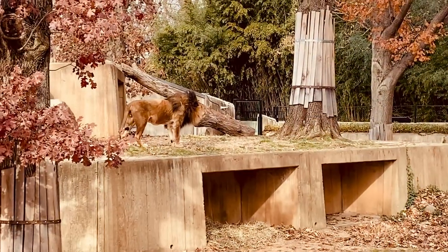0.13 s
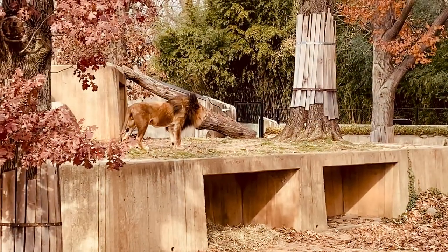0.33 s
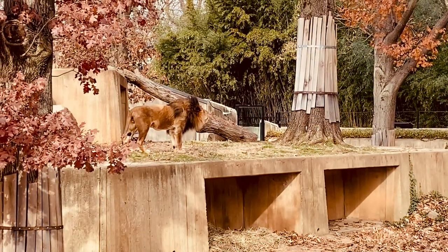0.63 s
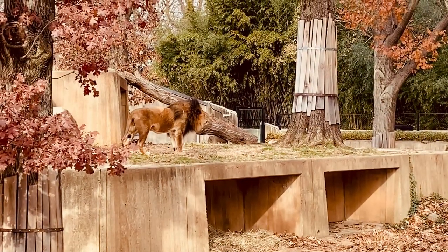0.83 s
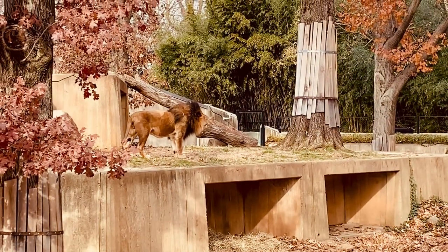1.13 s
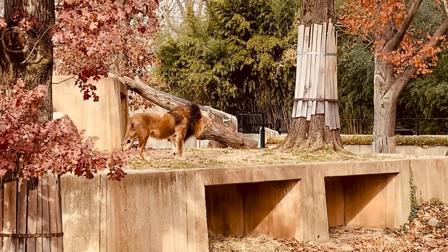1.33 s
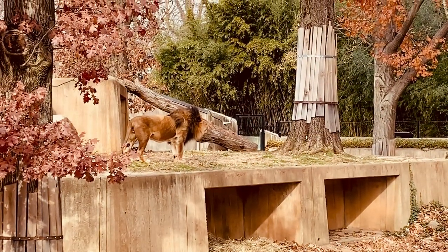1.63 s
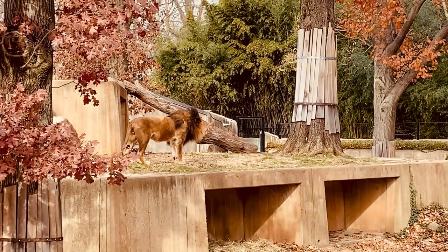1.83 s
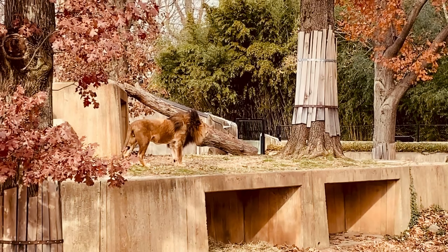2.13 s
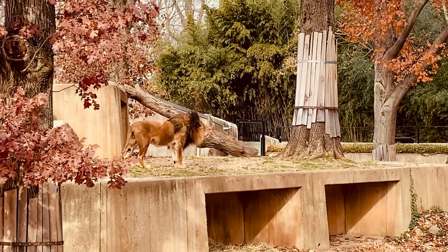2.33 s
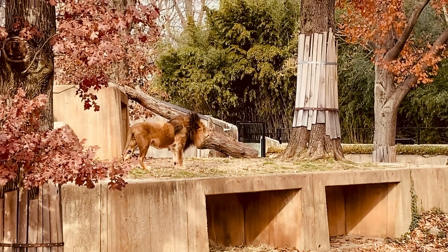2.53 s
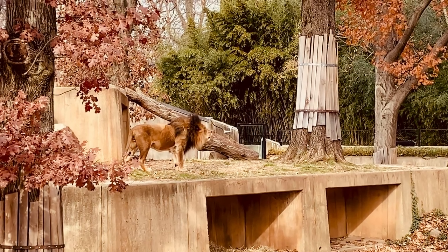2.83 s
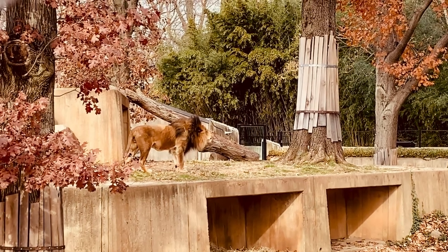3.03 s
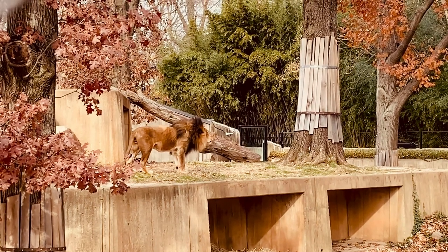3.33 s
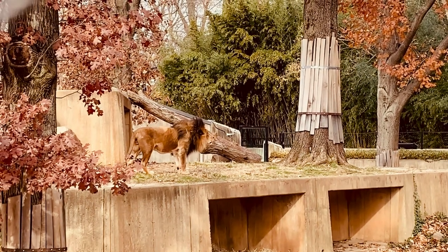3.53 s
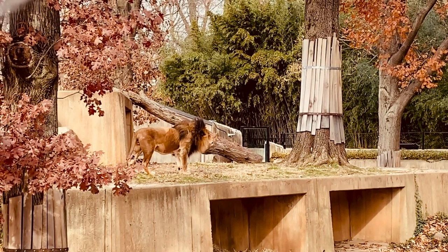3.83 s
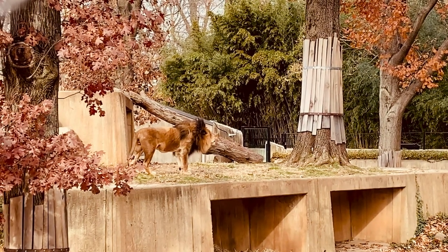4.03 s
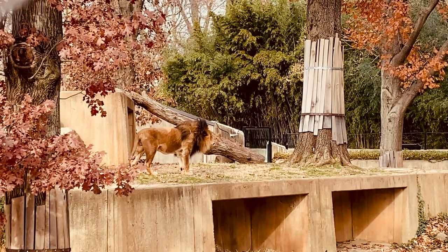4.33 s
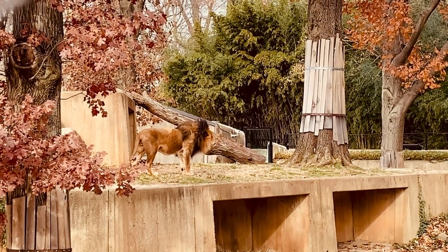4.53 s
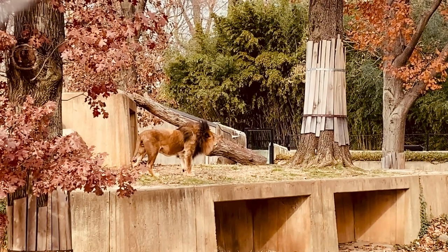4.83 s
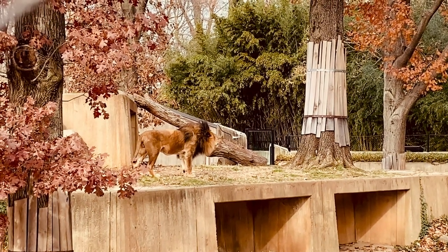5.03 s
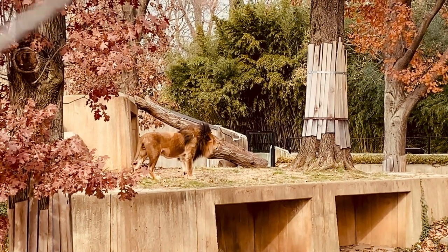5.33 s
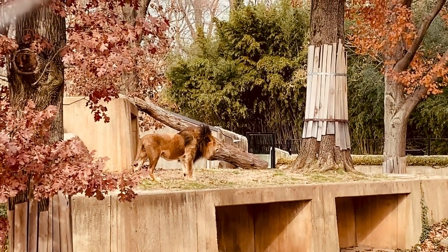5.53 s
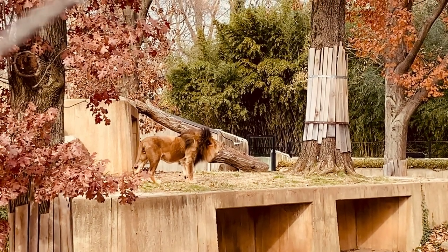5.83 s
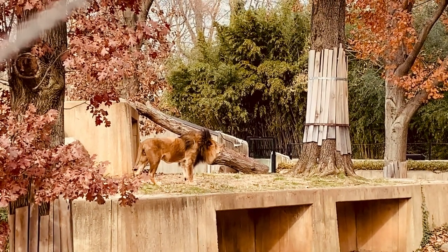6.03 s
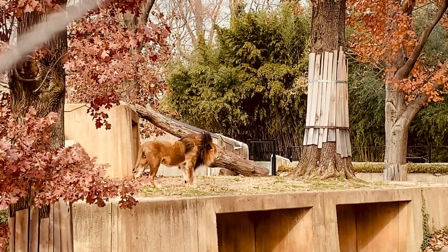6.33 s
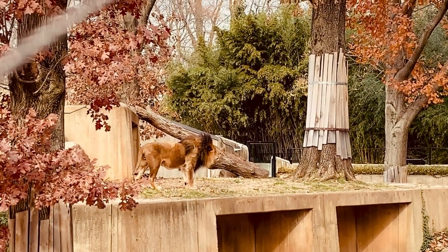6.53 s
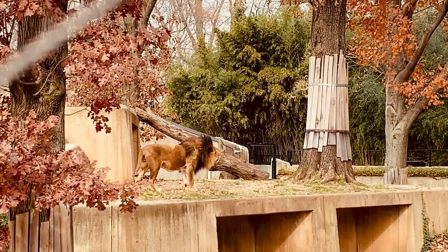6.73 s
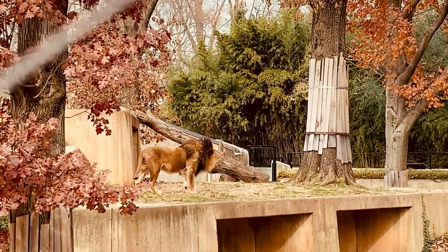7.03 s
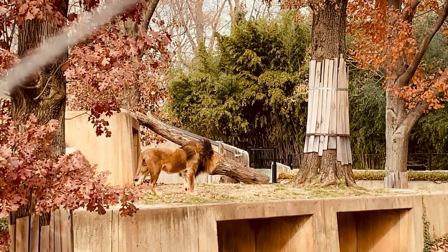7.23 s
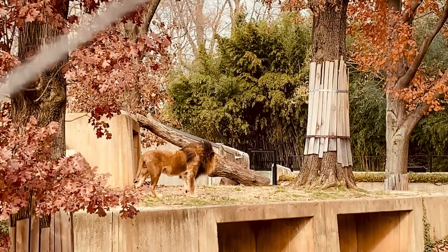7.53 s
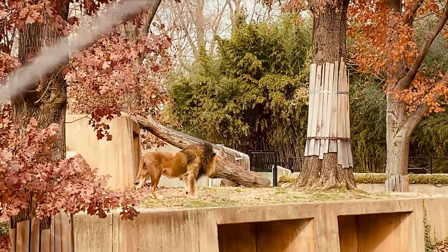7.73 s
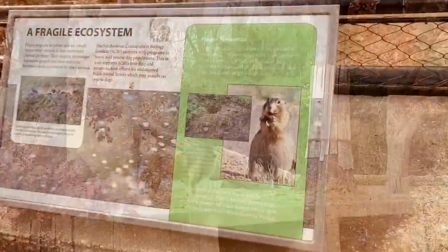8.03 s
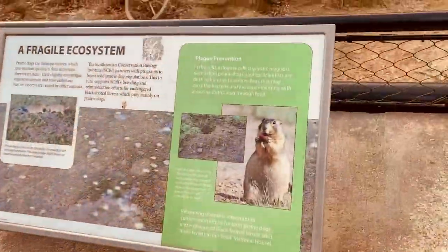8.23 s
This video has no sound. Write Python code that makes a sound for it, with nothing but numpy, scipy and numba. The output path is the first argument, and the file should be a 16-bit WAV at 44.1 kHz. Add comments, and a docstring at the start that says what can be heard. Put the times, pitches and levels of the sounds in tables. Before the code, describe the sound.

A distant male lion roars twice, then gives five shorter, fading grunts that echo off concrete walls over a low outdoor rumble.

```python
"""Lion calling in a walled yard

A lion roars twice, the first roar already under way, then grunts five times, far from a hand-held phone.
Heavy vocal folds beat about 140 times a second, strong and weak in turn, into a long throat.
Filtered noise echoes from concrete walls draw out each call. Shaped noise makes the low background with its
distant town rumble, a far moan, cloth rustle and small ticks near the phone; near the end the low
background cross-fades to a brighter one."""
import sys
import numpy as np
from scipy import signal
from scipy.fft import rfft, irfft
from scipy.io import wavfile
from scipy.ndimage import uniform_filter1d
from numba import njit

SR = 44100
rng = np.random.default_rng(int(sys.argv[2]) if len(sys.argv) > 2 else 0)


def materialize(psi):
    """Save the field psi as 16-bit PCM at rate SR to the path in sys.argv[1].

    A 1-D psi becomes a single channel; in a 2-D psi each row is a channel.
    """
    bounded = np.clip(np.atleast_2d(psi).T, -1, 1)
    quanta = np.round(bounded * 32767).astype(np.int16)
    wavfile.write(sys.argv[1], SR, quanta)


N = 369381

# The seven calls, levels ahead of the mix: t/s, breath length/s, open-mouth ring level/dB,
# breath rasp level/dB, chest rumble level/dB, jaw resonance f/Hz (it wanders about this),
# pitch factor of the low throat resonances, factor of the upper ones, trim of the throat growl level/dB
CALLS = [(-.1, 0.76, -30, -41, -37.5, 315, 1.0, 0.98, -4),
         (1.702, 0.46, -33.5, -43.5, -31, 300, 0.99, 1.011, -2.5),
         (2.981, 0.23, -31.5, -41, -29.5, 296, 0.99, .98, -2),
         (3.931, .2, -35, -45, -33, 293, 0.88, 1.063, 1), (4.883, .23, -35.5, -47, -31, 295, .87, 1.01, -3),
         (5.898, .26, -38, -48.5, -36, 303, 0.76, 1.057, -4),
         (7.14, 0.26, -38.5, -51, -39.5, 302.5, 0.89, .99, -2.5)]
# Voice and its first echoes through each call, with the dips where echoes beat, one list a call:
# t/s, beat rate of the folds f/Hz, boom level/dB, throat growl level/dB (ahead of its trim)
VOICES = [
    [(0.0, 154.9, -21.5, -25), (0.092, 154.6, -9.5, -20.5), (0.214, 158.2, -22, -20.5),
     (0.26, 156.4, -13, -25), (0.282, 153.9, -33.5, -26.5), (0.356, 162.2, -13.5, -22.5),
     (0.476, 157.5, -9, -29.5), (0.632, 156.3, -20.5, -20.5), (0.668, 162.3, -30, -28),
     (0.75, 160.3, -16.5, -31.5), (0.816, 152.3, -27, -40.5), (0.95, 157.2, -24.5, -40)],
    [(1.7, 144, -51, -37.5), (1.772, 140.8, -25.5, -26.5), (1.808, 147.7, -28.5, -33.5),
     (1.83, 148.7, -15.5, -23), (1.87, 150.4, -10, -22.5), (1.926, 153.3, -14, -28), (2.0, 150.4, -11, -22),
     (2.056, 145.6, -14, -27.5), (2.19, 145.9, -17.5, -27), (2.36, 147.4, -25, -44),
     (2.42, 156.4, -31, -38), (2.45, 154, -26, -40.5)],
    [(2.97, 136, -48, -42.5), (3.008, 133.3, -35, -34.5), (3.062, 134.3, -18, -31),
     (3.104, 145.4, -26.5, -21.5), (3.136, 147, -13, -24), (3.316, 148.8, -24.5, -32),
     (3.422, 144.6, -24, -49), (3.5, 151.1, -33, -44)],
    [(3.92, 133.9, -38, -45), (3.954, 129.4, -42, -37), (4.008, 129.8, -21.5, -25.5),
     (4.18, 130.9, -23, -29.5), (4.236, 128, -34, -36.5), (4.288, 137.6, -26, -40.5),
     (4.43, 134.9, -32, -48.5), (4.45, 136, -38.5, -41)],
    [(4.87, 133.2, -40.5, -51), (4.906, 133.1, -43, -34.5), (4.95, 130.4, -20.5, -27),
     (5.058, 131.8, -23, -16), (5.11, 131.2, -40.5, -32.5), (5.132, 132.4, -17, -28.5),
     (5.166, 133.8, -28.5, -42), (5.4, 136.4, -31, -45.5)],
    [(5.88, 116.8, -61, -53), (5.968, 115.9, -25.5, -21), (6.024, 128.4, -21, -21.5),
     (6.194, 128.3, -19, -31), (6.284, 126.9, -31, -47.5), (6.354, 117, -32.5, -47.5),
     (6.414, 130.7, -32.5, -53.5), (6.45, 131.1, -31, -48)],
    [(7.12, 116.4, -49.5, -50), (7.17, 116.8, -37, -35.5), (7.258, 121.2, -16, -25),
     (7.336, 129.6, -31.5, -28), (7.49, 128.8, -24, -37.5), (7.514, 132.8, -48.5, -44),
     (7.552, 122.3, -27, -47), (7.66, 122.5, -32.5, -49)],
]
CREAK_S = 0.065  # slow single beats that open every call but the first


def undb(db):
    """Gain of a dB value."""
    return 10 ** (np.asarray(db) / 20)


def seconds():
    """Time of every sample."""
    return np.arange(N) / SR


def level(x, db):
    """Scale to an rms level."""
    return x * undb(db) / np.sqrt(np.mean(x ** 2))


def curve(rows, k, off=None):
    """Column k of a table over time."""
    rows = np.array(rows)
    return np.interp(seconds(), rows[:, 0], rows[:, k], off, off)


def on_log(rows, hz):
    """A (f/Hz, value) table read on a log frequency axis."""
    rows = np.array(rows)
    return np.interp(np.log(hz), np.log(rows[:, 0]), rows[:, 1])


def fade(start, end, edge_s=0.042):
    """1 from start to end, with soft edges outside."""
    s = seconds()
    return np.clip(np.minimum(s - start + edge_s, end + edge_s - s) / edge_s, 0, 1)


def release(after_s, db_per_s):
    """Gain 1 that starts to die away at a given time."""
    return undb(-db_per_s * np.maximum(seconds() - after_s, 0))


def walk(rate):
    """Random levels held 1 / rate s and slewed twice; spread near 1."""
    k = int(SR / rate)
    steps = np.repeat(rng.standard_normal(N // k + 1), k)
    return 1.3 * uniform_filter1d(uniform_filter1d(steps, k), k)[:N]


def colour(x, rows):
    """Shape a sound by a (f/Hz, level/dB) table."""
    hz = np.fft.rfftfreq(len(x), 1 / SR) + 1
    return irfft(rfft(x) * undb(on_log(rows, hz)), len(x))


def band(x, hz, width):
    """One fixed resonance, gain 1 at its centre."""
    return signal.lfilter(*signal.iirpeak(hz, hz / width, SR), x)


@njit
def glide(x, hz, width):
    """State-variable band-pass whose centre moves."""
    y, b, l = np.empty(len(x)), 0., 0.
    for i in range(len(x)):
        g = np.tan(np.pi * hz[i] / SR)
        k = width / hz[i]
        v = (b + g * (x[i] - l)) / (1 + g * (g + k))
        b = 2 * v - b
        l = l + 2 * g * v
        y[i] = k * v
    return y


def steep_glide(x, hz, width, second_width):
    """Two moving band-passes in a row, for steeper skirts."""
    return glide(glide(x, hz, width), hz, second_width)


def sine(hz):
    """A tone of rms 1 that follows a pitch curve."""
    return np.sqrt(2) * np.sin(2 * np.pi * np.cumsum(hz) / SR)


def ring(x, modes, stretch):
    """Sum of steep resonances, neighbours in opposite sign, all moved by one factor."""
    out = 0
    for k, (hz, width, db) in enumerate(modes):
        part = level(steep_glide(x, hz * stretch, 1. * width, 1.57 * width), 0)
        out = out + (-1) ** k * undb(db) * part
    return level(out, 0)


def per_call(values):
    """One value a call, taken up just before the call starts."""
    starts = [call[0] - CREAK_S for call in CALLS]
    return np.asarray(values)[np.maximum(np.searchsorted(starts, seconds()) - 1, 0)]


def breath(shape, column):
    """Attack, hold and release of every call at the level in one column of CALLS."""
    start_db, jump_s, jump_db, full_s, end_db, db_per_s = shape
    out = 0
    for call in CALLS:
        start, end = call[0], call[0] + call[1]
        full = min(start + full_s, end - .01)
        rows = [(start, start_db), (start + jump_s, jump_db), (full, 0), (end, end_db)]
        gain = undb(curve(rows, 1) + call[column])
        out = out + fade(start, N / SR, .006) * gain * release(end, db_per_s)
    return out


def boom():
    """The beat rate sits on the lowest resonance, so it booms; noise in the chest rumbles below it."""
    boom_release = 63  # dB per s: the boom rings on among the walls
    echo_db, late_echo_db = -16, -7.5  # echo tone against the boom, during the breath and after it
    chest_rest_db, chest_rise_s, chest_lag_s, chest_release = -44, 0.39, 0.036, 32.5  # release in dB per s
    hz = curve(sum(VOICES, []), 1)
    gain = sum(fade(voice[0][0], N / SR) * undb(curve(voice, 2)) * release(voice[-1][0], boom_release)
               for voice in VOICES)
    # echoes of a slightly lower pitch beat against the tone
    breathing = sum(fade(call[0], call[0] + call[1], .06) for call in CALLS)
    echo_gain = undb(late_echo_db + (echo_db - late_echo_db) * breathing)
    tone = sine(hz * (1 + 0.007 * walk(25))) + echo_gain * sine(hz - 15 + 3 * walk(5))
    noise = rng.standard_normal(N)
    chest = undb(chest_rest_db)
    for call in CALLS:  # the rumble peaks after the breath and lingers
        top = call[0] + call[1] + chest_lag_s
        swell = fade(top, N / SR, chest_rise_s) ** 2
        chest = chest + swell * undb(call[4]) * release(top, chest_release)
    rumble = level(band(band(noise, 57, 35), 94, 120), 0) * chest
    smear = level(glide(glide(noise, 1.0 * hz, 39.0), 0.89 * hz, 52.0), -17.5)
    return gain * (tone + smear) + rumble, hz, gain


def growl():
    """Level of the throat growl, cut short when the breath ends."""
    out = 0
    for call, voice in zip(CALLS, VOICES):
        gain = undb(curve(voice, 3) + call[8])
        out = out + fade(call[0], N / SR, .01) * gain * release(call[0] + call[1], 130.5)  # dB per s
    return out


def folds(hz, rough):
    """One closure a beat, strong and weak in turn, uneven when rough, each followed by a puff of air."""
    creak_hz, weak_db = 44, -5
    s = seconds()
    creak = sum((s > call[0]) & (s < call[0] + CREAK_S) for call in CALLS[1:]) > 0
    hz = np.where(creak, creak_hz, hz)
    phase = np.cumsum(hz * (1 + .15 * rough * walk(60))) / SR
    for call in CALLS[1:]:  # a call opens with a closure
        i = int(call[0] * SR)
        phase[i:] += -phase[i - 1] % 1
    cycle = phase.astype(int)
    uneven_db = 5 * rough * rng.standard_normal(N)[cycle]
    size = undb(uneven_db + weak_db * (cycle % 2) * ~creak)
    pulses = np.diff(cycle, prepend=0) * size / hz ** 0.37
    puff_shape = .7 + np.exp(-(phase % 1) / .3)
    puff = np.sqrt(size) * puff_shape * rng.standard_normal(N)
    return level(pulses, 0), level(puff, 0)


def roar(hz, throat):
    """Fold pulses and puffs through the throat; higher resonances are fed more by the air."""
    # per call: 0 clear folds to 1 all noise, in the low throat
    roughness = [.3, .35, .4, .7, .62, .6, .65]
    # throat resonances: f/Hz, width/Hz, level/dB within the group; Hz ahead of the call's pitch factor
    low_modes = [(227, 64, -5.5), (400, 194, -7.5), (490.8, 116, -5)]
    mid_modes = [(760.7, 61, -1), (1012.4, 85, -5), (1186, 85, -7), (1396, 150, -15)]
    high_modes = [(1755, 100, -5), (2118, 390, -1), (2587, 290, -2.5), (3000, 440, -3), (3880, 1000, -11),
                  (5080, 2800, -9.5)]
    # breath shape of the open-mouth ring: level/dB at start, first jump t/s, level/dB after it,
    # full t/s, level/dB as breath ends, release dB/s; times from the start of the call
    ring_shape = (-17.5, .04, -9.5, -0.14, -3, 197.5)
    # breath shape of the rasp: same columns
    rasp_shape = (-23, 0.1465, -4, -0.05, -3.5, 113)
    rough = per_call(roughness)
    pulses, puff = folds(hz, rough)
    gains = [throat, breath(ring_shape, column=2), breath(rasp_shape, column=3)]
    groups = [(low_modes, 0), (mid_modes, .1), (high_modes, .72)]  # with extra share of air
    out, columns = 0, np.array(CALLS).T
    for k, (modes, airy) in enumerate(groups):
        share = np.clip(rough + airy, 0, 1)
        drive = np.sqrt(1 - share) * pulses + np.sqrt(share) * puff
        pitch_factor = per_call(columns[6 + min(k, 1)])
        voice = ring(drive, modes, pitch_factor * (1 + 0.035 * rough * walk(9)))
        if k == 0:  # the jaw moves the second resonance
            jaw_hz = per_call(columns[5]) * (1 + 0.044 * walk(4.6))
            voice = voice + level(steep_glide(drive, jaw_hz, 99.0, 130.0), 0.017)
        out = out + voice * gains[k]
    return out


def overtones(hz):
    """Harmonics 4 to 6 of the strong-weak pair swell and fade where the folds beat evenly."""
    # moments of even beating: t/s, length/s, 4th harmonic level/dB, 5th level/dB, 6th level/dB;
    # a random flicker moves about these levels
    even_moments = [(0, 0.17, -31.5, -31.5, -44.5), (0.102, 0.18, -40.5, -25, -46),
                    (0.267, 0.2, -23, -30.5, -35.5), (0.555, 0.1, -33, -28, -36.5),
                    (1.758, 0.14, -29, -30.5, -37.5), (1.94, 0.12, -31.5, -25, -33),
                    (2.111, .18, -33.5, -36, -45), (3.078, 0.11, -24.5, -42, -32.5),
                    (3.192, 0.18, -27.5, -43, -47), (5.995, .28, -37.5, -36.5, -37.5)]
    flicker_db = 2
    s, out = seconds(), 0
    pair_hz = hz / 2 * (1 + .004 * walk(30))
    for k in range(3):
        gain = 0
        for row in even_moments:
            progress = np.clip((s - row[0]) / row[1], 0, 1)
            gain = gain + np.sqrt(np.abs(np.sin(np.pi * progress))) * undb(row[k + 2])
        out = out + sine((k + 4) * pair_hz) * gain * undb(flicker_db * walk(17))
    return out


def walls(x):
    """Dense echoes off the concrete, each band of noise dying at its own rate."""
    # echo bands: f/Hz, t60/s, level/dB (relative)
    echo_bands = [(244, 0.77, -1.8), (535, 0.5, -2.9), (920, 1.1, -5), (2700, 0.88, 5.5), (5000, 0.53, 3.5),
                  (8000, 1.5, -8)]
    s = np.arange(2 * SR) / SR
    tail = 0
    for hz, t60, db in echo_bands:
        noise = band(rng.standard_normal(len(s)), hz, 0.75 * hz) / np.sqrt(hz * t60)
        tail = tail + noise * undb(db - 60 * s / t60)
    tail = tail * np.clip(s / 0.012, 0, 1)
    return signal.fftconvolve(x, tail / np.sqrt(np.sum(tail ** 2)))[:N]


def air():
    """Half-octave noise bands, moving partly together and partly alone, shaped into two backgrounds."""
    # spectrum of the low background, with the distant town: f/Hz, level/dB (relative, per Hz)
    low_tone = [(25, -37), (60, 2), (130, 11), (220, -1.5), (350, -1.5), (600, -15.5), (1000, -27),
                (2500, -41), (4500, -53.5), (9000, -67), (14000, -70.5)]
    # level of the low background, with the roars' lingering low echo: t/s, level/dB
    low_level = [(0, 4), (1.601, -3.5), (2.9, 0.5), (3.9, -3.5), (5.8, -7), (7, -4.5), (7.699, -6.5),
                 (8.1, -31.5)]
    # spectrum of the brighter background: f/Hz, level/dB (relative, per Hz)
    bright_tone = [(25, -21), (60, -4.5), (150, -4.5), (300, -15.5), (600, -20), (1200, -27.5),
                   (1700, -37.5), (2080, -26.5), (2500, -37), (4000, -40), (8000, -50.5), (14000, -55.5)]
    # fade-in of the brighter background, the other half of the cross-fade near the end: t/s, level/dB
    bright_fade = [(7.651, -27), (7.899, -10), (8.1, -9), (8.38, -6.5)]
    out, shared = 0, walk(1.9)
    for hz in 35 * 2 ** np.arange(0, 9, .5):
        flutter = undb(0.94 * shared + 1.0 * walk(4.9))
        out = out + flutter * band(rng.standard_normal(N), hz, hz / 3)
    low = level(colour(out, low_tone), -38) * undb(curve(low_level, 1))
    bright = level(colour(out, bright_tone), -40.5) * undb(curve(bright_fade, 1))
    return low + bright


def sag(hz, gain):
    """The folds slacken as a call ends: the pitch slides down under the ringing boom."""
    sag_hz, sag_s, sag_db = 105.5, 0.12, -1  # pitch reached, time taken, level against the boom
    s, out = seconds(), 0
    for call in CALLS:
        end = call[0] + call[1]
        gone = np.clip((s - end) / sag_s, 0, 1)
        boom_gain = gain[int((end + sag_s / 2) * SR)]
        out = out + sine(hz + (sag_hz - hz) * gone) * np.sin(np.pi * gone) * boom_gain * undb(sag_db)
    return out


def moan():
    """A breathy wavering tone from far off: noise through a narrow moving band."""
    # faint moans: t/s, length/s, f/Hz (it wavers about this), level/dB
    moans = [(1.007, 0.53, 334, -45), (3.542, 0.31, 342, -48.5), (4.517, 0.21, 375, -53)]
    path_hz = np.interp(seconds(), [row[0] for row in moans], [row[2] for row in moans])
    hz = path_hz * (1 + .06 * walk(7.4))
    tone = level(steep_glide(rng.standard_normal(N), hz, 50.0, 73.0), 0)
    return tone * sum(fade(t, t + length, 0.073) * undb(db) for t, length, _, db in moans)


def hands():
    """Cloth brushes near the phone; small ticks of the grip, each with a duller knock of the case."""
    # cloth brushes: t/s, length/s, level/dB
    rustles = [(5.22, .42, -61), (6.62, 0.33, -76.5)]
    # spectrum of the cloth: f/Hz, level/dB (relative, per Hz)
    cloth_tone = [(300, -9), (1000, -3), (3000, 1.5), (4500, -4.5), (7500, -7), (9000, -31), (11000, -9),
                  (15500, -30)]
    # ticks: t/s, peak level/dB, centre f/Hz, width/Hz, t60/s
    ticks = [(2.7573, -48, 2770, 3800, 0.1), (4.491, -43, 1700, 2170, 0.04),
             (5.659, -39.5, 900, 1970, 0.062), (5.666, -49, 2500, 6000, 0.039),
             (6.554, -53, 3800, 3000, 0.14), (7.785, -57, 2010, 796, .04)]
    out = level(colour(rng.standard_normal(N), cloth_tone), 0) * undb(1.6 * walk(60))
    out = out * sum(fade(t, t + length, 0.1) * undb(db) for t, length, db in rustles)
    s = np.arange(SR // 10) / SR
    for t, db, hz, width, t60 in ticks:
        noise = rng.standard_normal(len(s))
        click = level(steep_glide(noise, hz + 0 * s, 1. * width, 2. * width), 0)
        knock = level(band(noise, 800, 900), -7.5)
        burst = (click + knock) * undb(-60 * s / t60) * np.clip(s / 0.0009, 0, 1)
        i = int(t * SR)
        out[i:i + len(s)] += burst * undb(db) / np.abs(burst).max()
    return out


def scene():
    """Mid from every source; side from separate echoes and air plus delayed near sounds, narrow in the bass."""
    # gain of the side channel: f/Hz, level/dB
    side_gain = [(60, -19), (125, -23.5), (250, -14.5), (700, -6.5), (1500, -1), (3000, -15), (6000, -20.5),
                 (9000, 3.5), (13000, -7.5)]
    # left minus right of the mid: f/Hz, level/dB
    left_lean = [(60, 0), (250, -1.8), (500, 2), (800, 1), (1500, 1.5), (3000, 0)]
    wet_db, dry_db = -10.5, -3  # voice by way of the walls, and direct
    low, hz, gain = boom()
    throat = growl()
    clear = overtones(hz)
    voice = roar(hz, throat)
    far = [undb(wet_db) * walls(voice + undb(-12) * clear) + air() for _ in range(2)]
    near = low + sag(hz, gain) + clear + moan() + hands()
    mid = undb(dry_db) * voice + far[0] + near
    side = colour(far[1] + np.roll(near, 60), side_gain)  # 60 samples late
    channels = []
    for way in (1, -1):  # left, right
        half_lean = [(f, way * db / 2) for f, db in left_lean]
        channels.append(colour(mid, half_lean) + way * side)
    return np.array(channels)


def record(dry):
    """The phone's microphone drops the deepest bass and cuts the top."""
    low_cut = signal.butter(3, 42, "high", fs=SR, output="sos")
    top_cut = signal.ellip(8, .2, 70, 15700, fs=SR, output="sos")
    return signal.sosfilt(top_cut, signal.sosfilt(low_cut, dry))


dry = scene()
out = record(dry)
materialize(out)
```